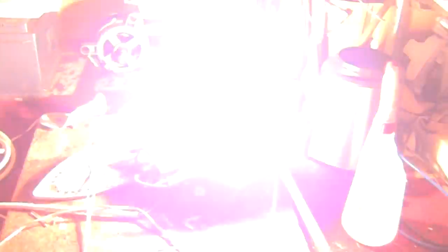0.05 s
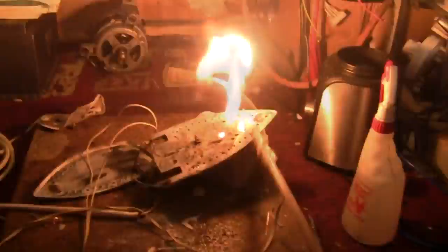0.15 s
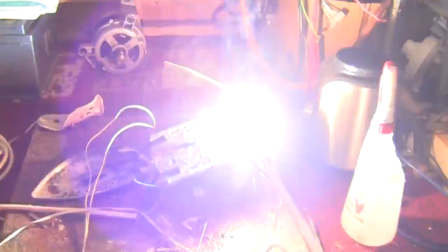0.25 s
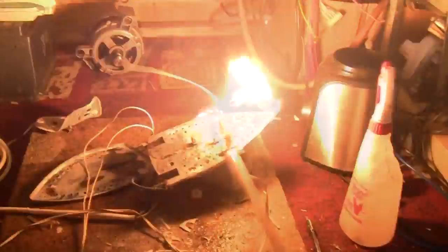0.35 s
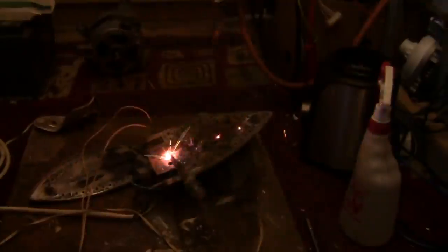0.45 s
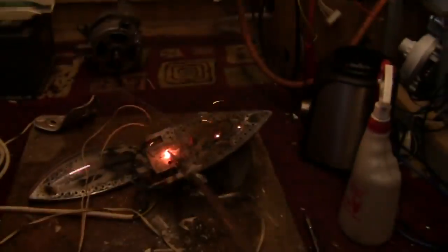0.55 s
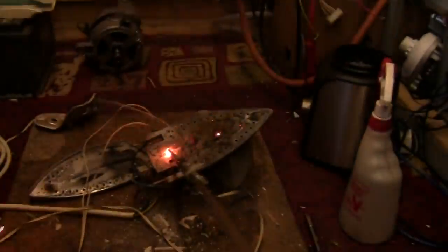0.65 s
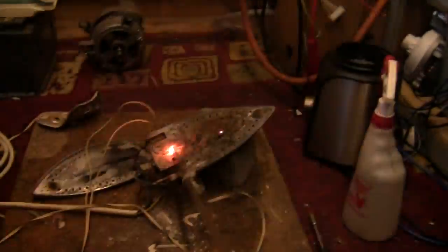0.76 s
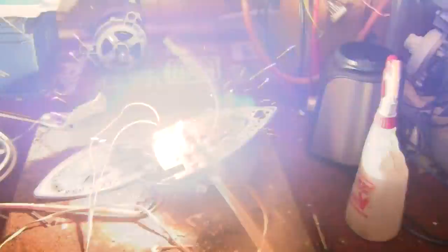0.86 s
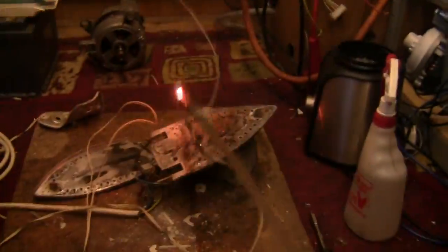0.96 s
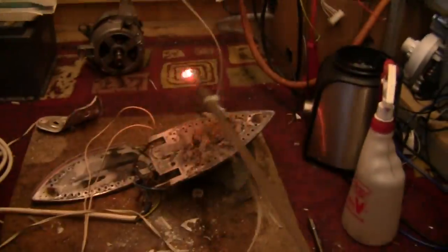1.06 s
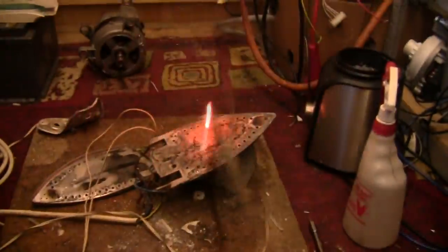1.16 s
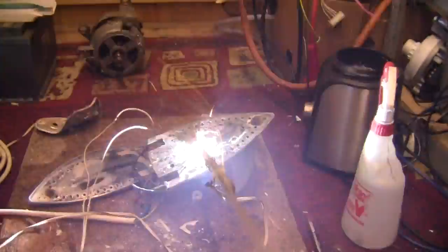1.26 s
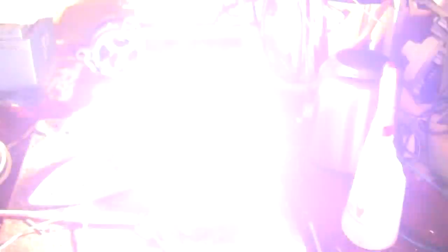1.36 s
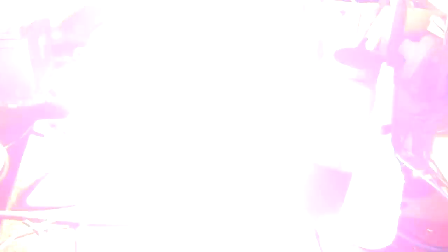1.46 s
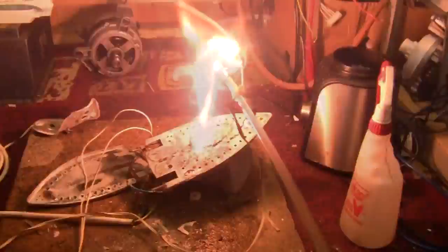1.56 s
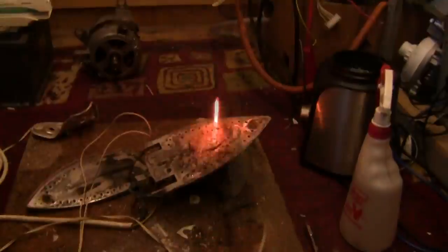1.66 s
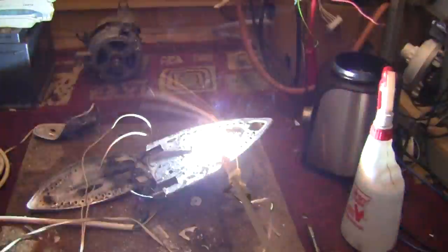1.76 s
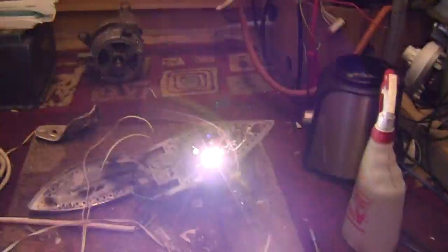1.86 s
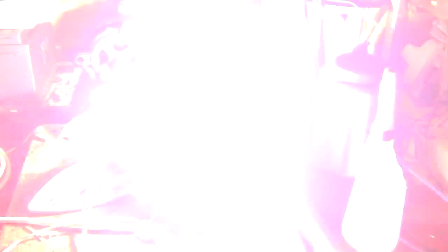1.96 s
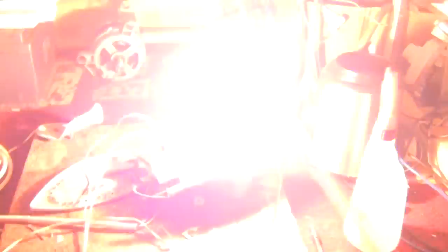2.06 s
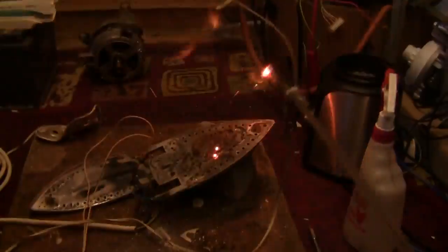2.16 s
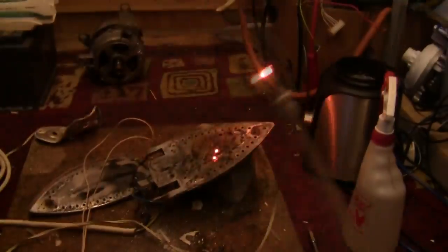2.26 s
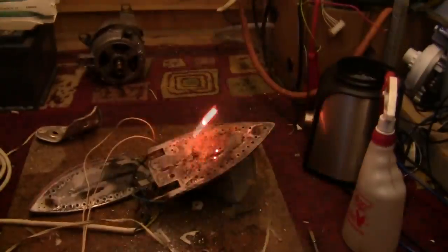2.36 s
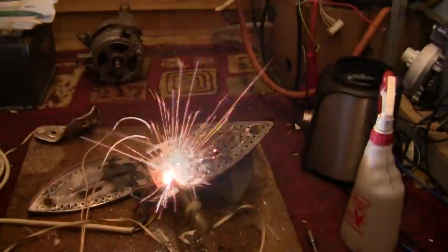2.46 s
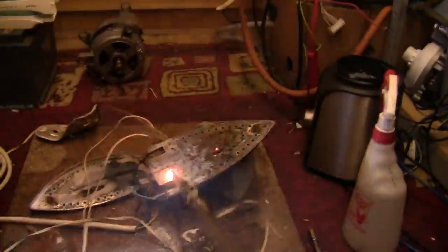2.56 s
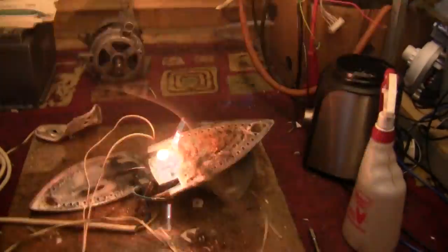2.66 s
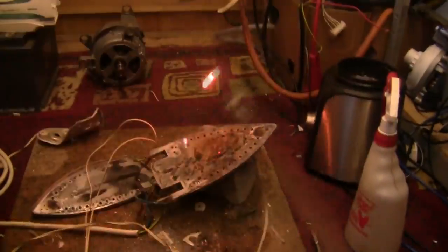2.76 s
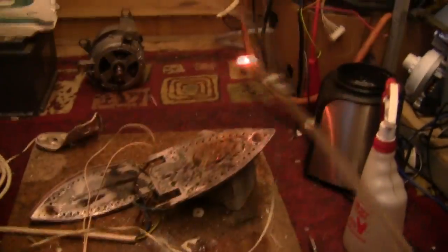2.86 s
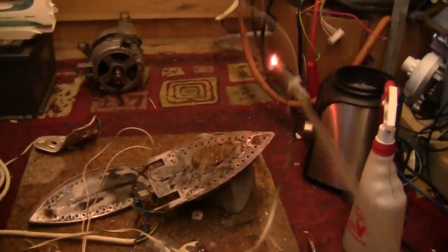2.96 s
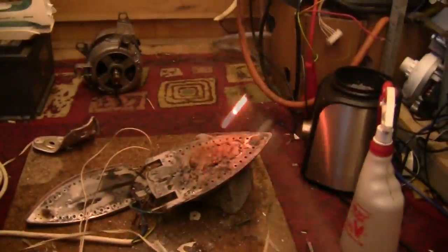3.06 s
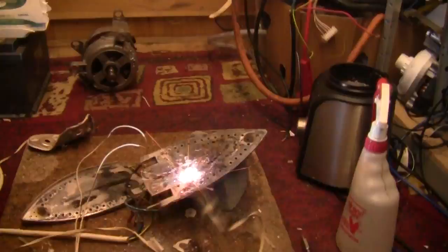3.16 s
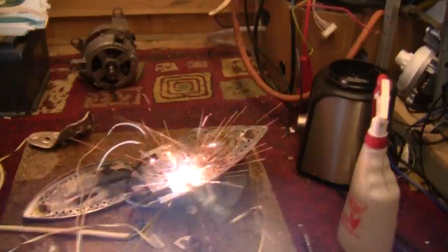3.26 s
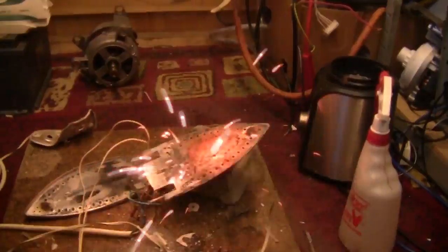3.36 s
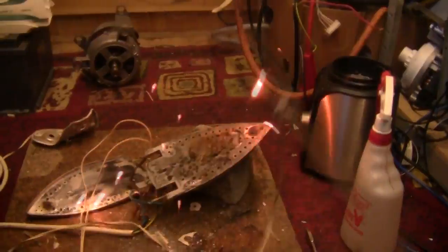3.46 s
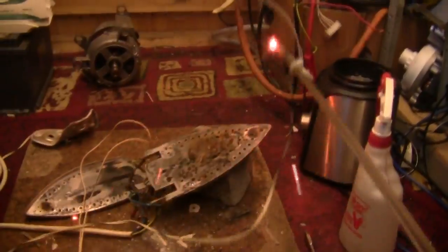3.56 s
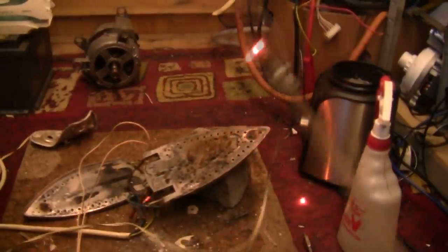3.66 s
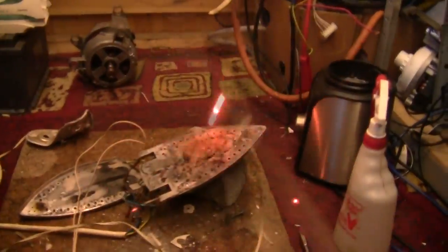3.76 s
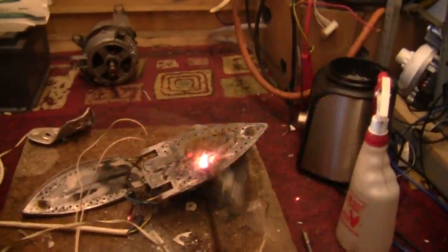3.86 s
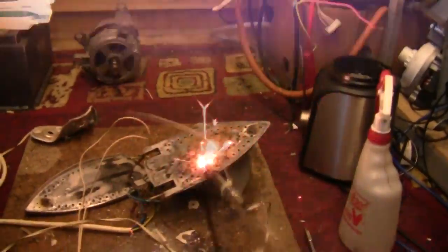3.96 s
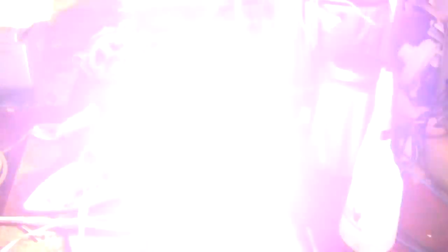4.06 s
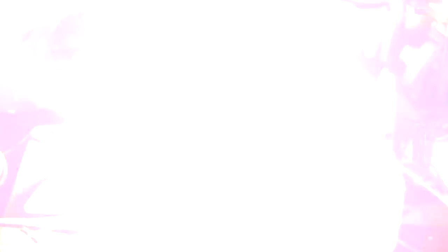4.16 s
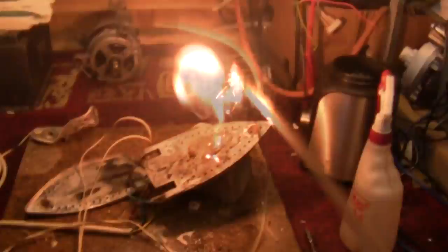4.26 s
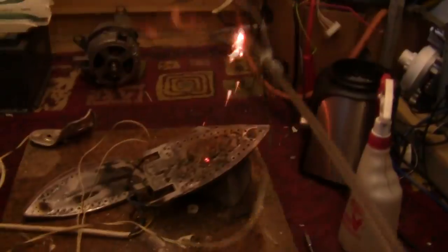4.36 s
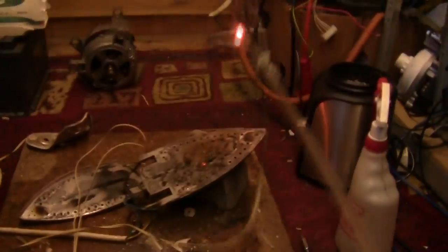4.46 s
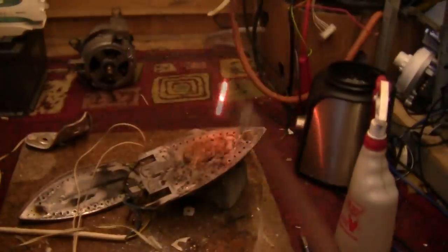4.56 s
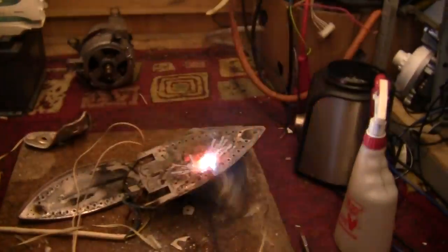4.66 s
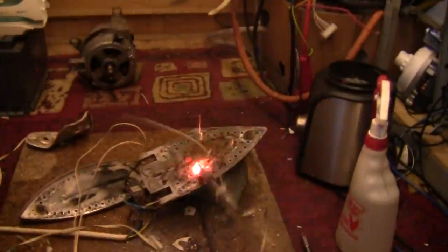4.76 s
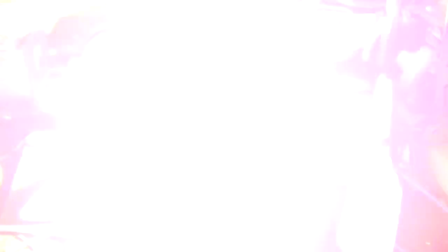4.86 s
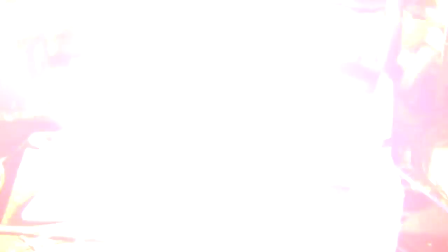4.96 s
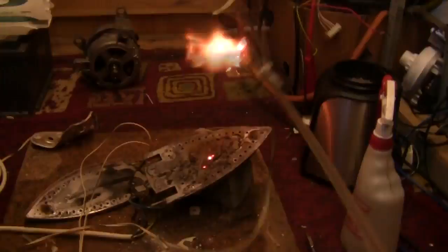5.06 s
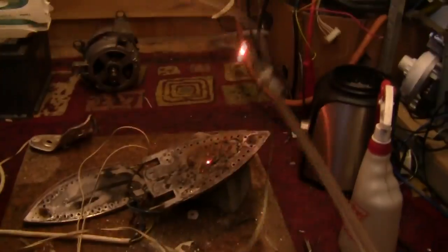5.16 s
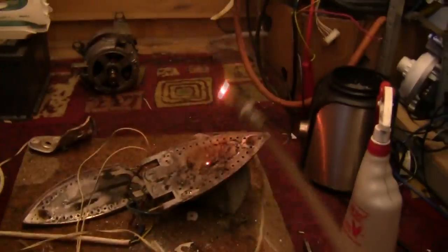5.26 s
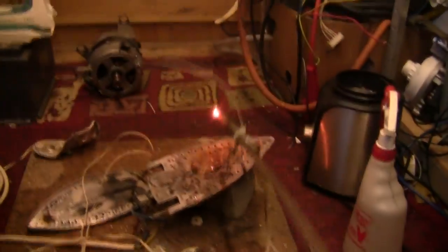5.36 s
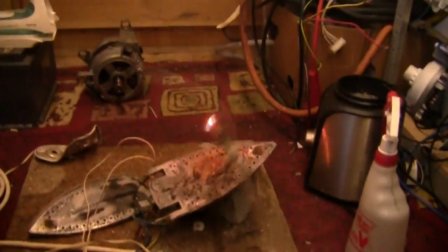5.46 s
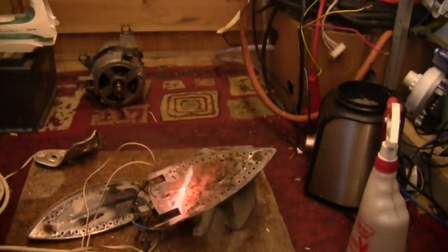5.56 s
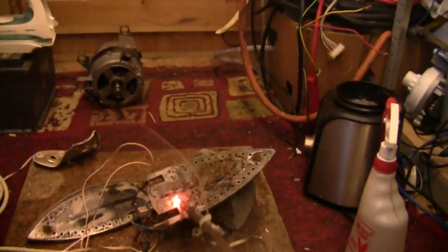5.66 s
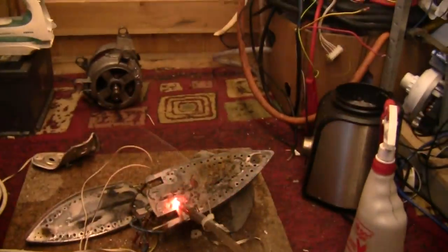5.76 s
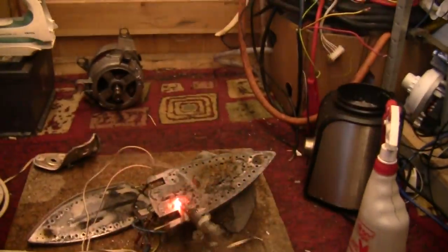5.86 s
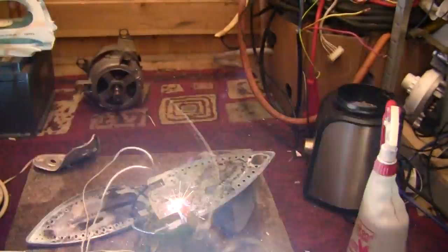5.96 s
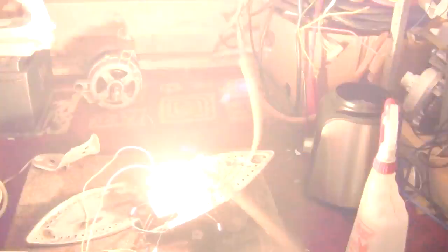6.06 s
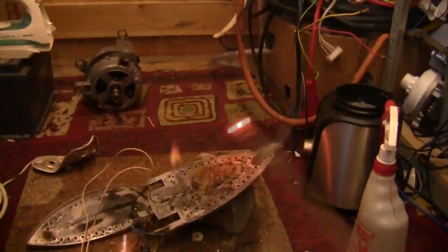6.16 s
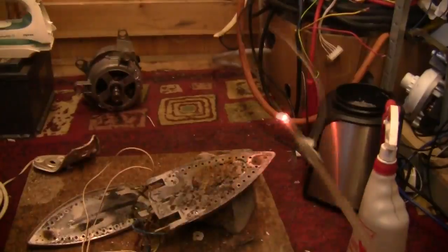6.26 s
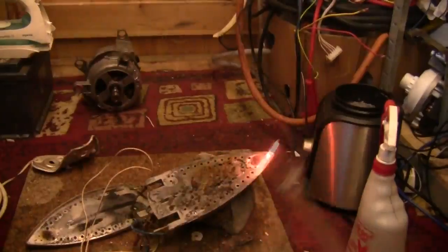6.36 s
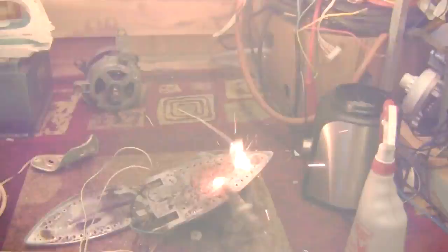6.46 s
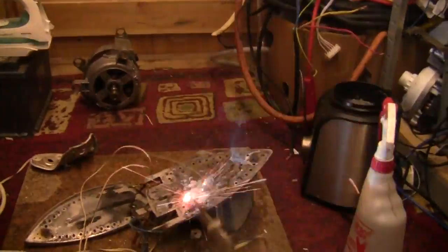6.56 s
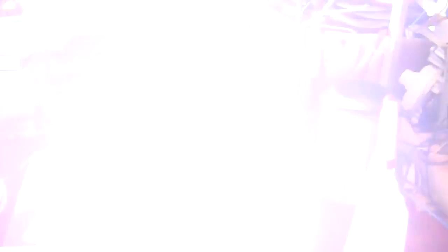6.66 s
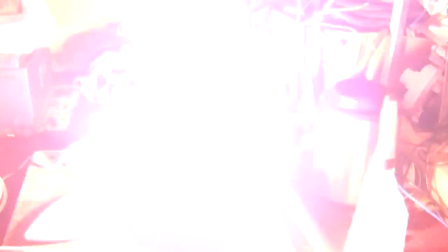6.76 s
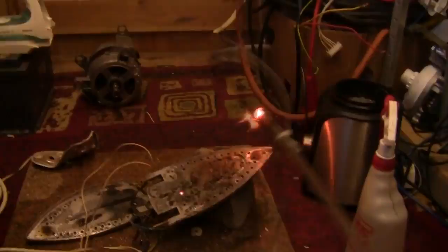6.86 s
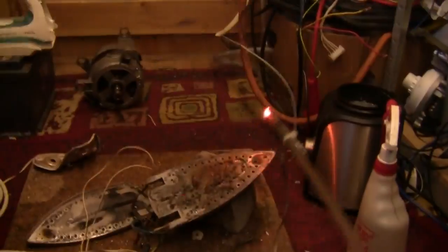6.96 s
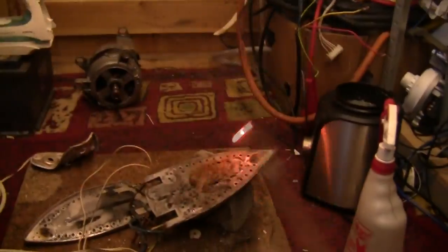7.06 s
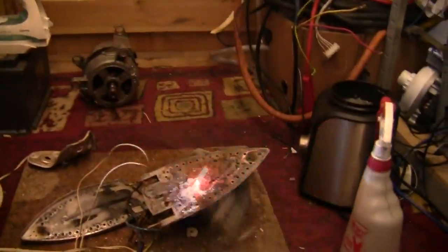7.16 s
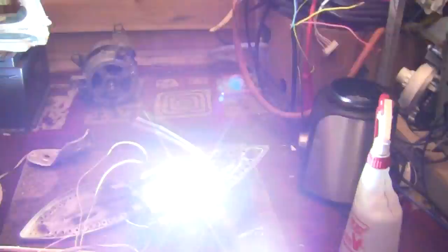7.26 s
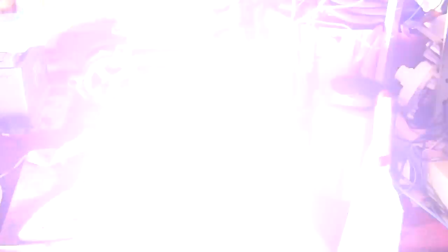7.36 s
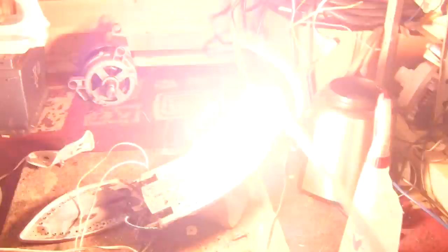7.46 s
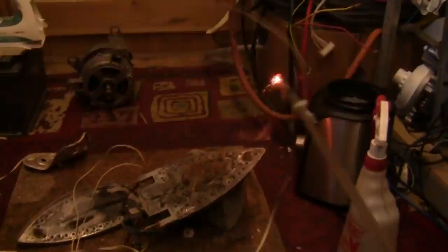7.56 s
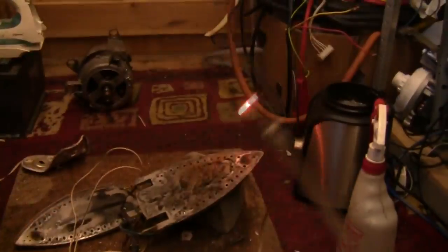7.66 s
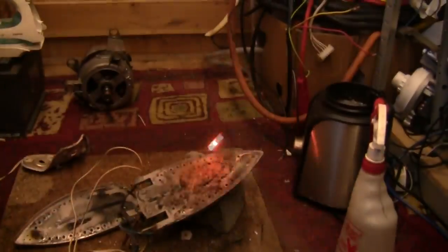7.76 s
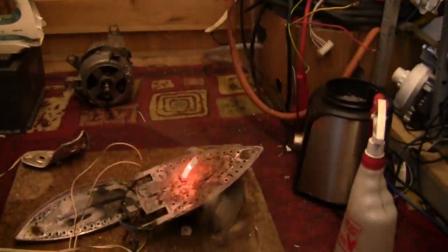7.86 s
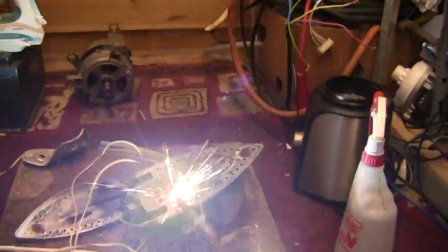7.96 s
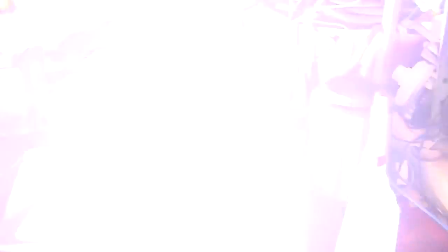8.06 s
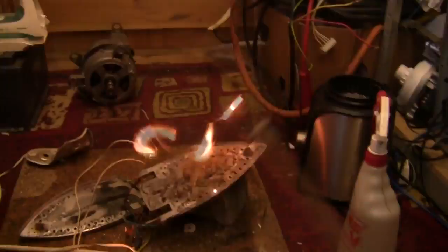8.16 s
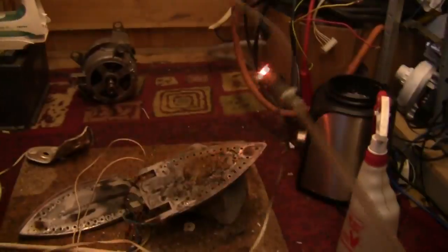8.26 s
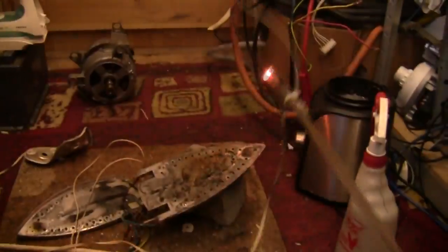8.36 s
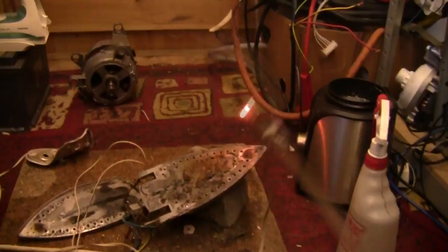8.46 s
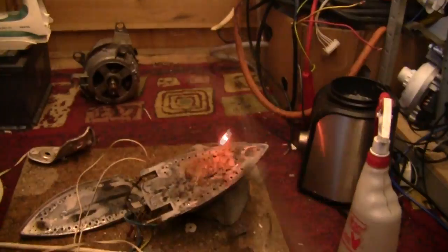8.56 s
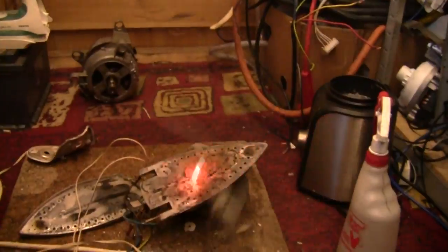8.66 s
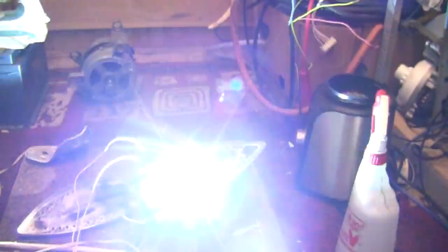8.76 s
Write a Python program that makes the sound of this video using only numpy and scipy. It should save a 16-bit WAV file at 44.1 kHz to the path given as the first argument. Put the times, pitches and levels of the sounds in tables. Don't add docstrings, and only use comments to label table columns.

```python
import sys
import numpy as np
from scipy import signal
from scipy.fft import rfft, irfft, next_fast_len
from scipy.io import wavfile
from scipy.ndimage import uniform_filter1d

SR = 44100
rng = np.random.default_rng(int(sys.argv[2]) if len(sys.argv) > 2 else 0)


def materialize(psi):
    bounded = np.clip(np.atleast_2d(psi).T, -1, 1)
    quanta = np.round(bounded * 32767).astype(np.int16)
    wavfile.write(sys.argv[1], SR, quanta)


def field_ratio(decibels):
    return 10 ** (np.asarray(decibels, dtype=float) / 20)


N = 388521


def curve(rows):
    s, *columns = np.transpose(rows)
    return [np.interp(np.arange(N) / SR, s, column) for column in columns]


def on_log_hz(points, size):
    hz, value = np.transpose(points)
    bins_hz = np.fft.rfftfreq(size, 1 / SR)
    return np.interp(np.log(bins_hz + 1), np.log(hz + 1), value)


def noise(points):
    x = irfft(rfft(rng.standard_normal(N)) * field_ratio(on_log_hz(points, N)), N)
    return x / x.std()


def walk(rate):
    hold = int(SR / rate)
    levels = np.repeat(rng.standard_normal(N // hold + 1), hold)
    return uniform_filter1d(levels, hold)[:N]


def add(track, s, x):
    i = max(int(s * SR), 0)
    track[i:i + len(x)] += x[:N - i]


# start in seconds, peak in dB, low, middle and upper modes in dB.
TAPS = [(0.0, -6, -13.5, -10.5, -3), (0.2693, -10.5, -13, -5, -0.5), (0.5561, -7.5, -17, -8, -12),
        (1.2886, -4.5, -27, -16, -8), (1.798, -10, -6, -3, -26), (1.9124, -20, -2.5, -13.5, -6),
        (2.5467, -28, -1, 2, 2.5), (3.254, -14, -8, -14.5, -8.5), (3.967, -24, -5, -4.5, -1.5),
        (4.7646, -23.5, 1, -6, 1.5), (5.6871, -10.5, 0.5, -5, -9.5), (6.507, -19.5, -10.5, -11, -0.5),
        (6.653, -26, -29, -6.5, -4.5), (7.2882, -16, -14, -10, -11), (8.031, -18.5, -8, -7.5, -12),
        (8.8056, -41, 24, 0.5, -16)]
MODES_HZ = [505, 548, 877, 1050, 1290, 1518, 1652, 1761, 1889, 2293, 2530, 2585, 2855, 3165, 3240, 3450,
            3550, 3720, 3890, 4300, 4765]
# level in dB, t60 in seconds.
MODES = [(-4.5, 0.5), (0, 0.12), (-10, 0.12), (-11, 0.061), (-3, 0.2), (-10.5, 0.13), (0, 0.1), (2, 0.12),
         (5.5, 0.145), (-4.5, 0.08), (-7, 0.09), (-5, 0.16), (-6, 0.05), (-14.5, 0.11), (3, 0.05),
         (3.5, 0.04), (-10.5, 0.081), (-16, 0.062), (-3, 0.045), (-13.5, 0.06), (-7, .09)]
# tap number, mode in Hz, gain in dB.
FAVOURS = [(0, 1761, -10), (0, 1889, -7), (0, 2585, -7), (0, 3240, -6), (0, 4765, -11), (1, 505, 11),
           (1, 548, 12), (1, 1652, -8), (1, 1889, -3), (1, 2585, -11), (1, 2855, 7), (1, 3240, -9),
           (2, 1290, 7), (2, 1761, -11), (2, 1889, -8), (2, 2585, -7), (3, 2585, -10), (3, 3165, 9),
           (3, 3240, 4), (3, 3450, 7), (3, 4300, -8), (4, 1652, -8), (4, 1761, -6), (4, 1889, -4),
           (4, 2585, -5), (5, 2585, -11), (6, 505, 12), (6, 1518, -10), (6, 1761, 8), (6, 1889, -7),
           (6, 2293, 12), (6, 2855, -10), (6, 3450, 9), (6, 3890, 12), (7, 548, 9), (7, 1290, -10),
           (7, 2585, 4), (7, 3240, 9), (7, 3450, 12), (8, 1652, 11), (8, 1889, -13), (8, 3450, 12),
           (9, 1889, -14), (10, 1290, -8), (10, 1761, -6), (10, 1889, -6), (10, 2585, -7), (10, 3240, 7),
           (10, 3450, 8), (10, 3890, 12), (11, 1761, 11), (11, 3450, 10), (13, 1889, -10), (13, 2585, -8),
           (13, 3240, 11), (13, 3550, 12), (14, 3240, 12), (14, 3550, 12)]
# frequency in Hz, density in dB per Hz.
TREBLE = [(1500, -0.5), (2300, 2), (3700, 4), (5200, -1.5), (8300, 0.5), (10000, -2), (11500, -12),
          (13500, -15.5), (15000, -23.5), (16500, -54)]
# frequency in Hz, density in dB per Hz.
BODY = [(50, -38), (150, 8.5), (300, 6), (700, 4.5), (1500, -2.5), (2500, -6), (5000, -37.5)]
LOWEST_DB = -24
DAMP_PER_DB = 0.018
THUD_DB, THUD_SHARE = -28.5, 0.27


def plate():
    scatter_db, push_s, thud_hz = 1.5, 0.0011, 185
    out, t = np.zeros(N), np.arange(SR // 2) / SR
    hz = np.array(MODES_HZ)[:, None]
    db, t60 = np.transpose(MODES)[:, :, None]
    chance = rng.standard_normal((len(TAPS), 3, len(MODES), 1))
    crack = noise(BODY) + 0.84 * noise(TREBLE)
    push = 1 - np.exp(-t / push_s)
    thud_tone = np.sin(2 * np.pi * thud_hz * t) + 0.7 * np.sin(2 * np.pi * 1.33 * thud_hz * t)
    thud_shape = 1000 ** (-t / 0.37) * (1 - np.exp(-t / 0.00066))
    for tap, (s, peak_db, low_db, middle_db, upper_db) in enumerate(TAPS):
        size, detune, turn = chance[tap]
        regions = [hz < 700, hz < 1450, hz < 2100, hz < 3000]
        colour_db = np.select(regions, [LOWEST_DB - peak_db, low_db, middle_db, 0], upper_db)
        for number, mode, gain_db in FAVOURS:
            if number == tap:
                colour_db = colour_db + gain_db * (abs(hz / mode - 1) < 0.022)
        tones = np.sin(2 * np.pi * hz * (1 + 0.0015 * detune) * t + 3 * turn)
        damping = 1 - DAMP_PER_DB * (peak_db + 19)
        modes = field_ratio(db + colour_db + scatter_db * size) * tones * 1000 ** (-t / t60 * damping)
        ring = modes.sum(axis=0) * push
        snap = field_ratio(-3) * crack[int(s * SR / 2):][:len(t)] * np.exp(-t / 0.0058) * push
        thud = field_ratio(THUD_DB - (1 - THUD_SHARE) * peak_db + 4) * thud_tone * thud_shape
        add(out, s, field_ratio(peak_db - 3.5) * (ring + snap + thud))
    return out


# start in seconds, treble in dB, cooling in dB per second
# (negative swells), low part in dB relative to the treble.
SIZZLE = [(0.0, -58.5, -7, 4.5), (.6, -55, 6, 10.5), (1.0, -58.5, 10, 5), (1.7, -61, 2.5, 9),
          (2.2, -66, -5.5, 2), (2.356, -50.5, 3, -3.5), (2.6, -48.5, 21, 3.5), (2.8, -50, 36.5, -0.5),
          (3.5, -67.5, 13, 10.5), (4.4, -67, 0.5, 14.5), (5.15, -67, 3, 16), (5.8, -63, -7, 16),
          (6.25, -72.5, -16, 20.5), (6.57, -62, 7.5, 17.5), (6.95, -67, 10, 11.5), (7.65, -70.5, -1, 4.5),
          (8.3, -69.5, 8, 2)]
GLOW_DB, GLOW_LOW_DB, GLOW_T60_S = -39, 10.5, 0.45
LOW_COOLING = 0.75


def heat():
    t = np.arange(N) / SR
    starts = np.transpose(SIZZLE)[0]
    current = np.searchsorted(starts, t, "right").clip(1) - 1
    start, db, cooling, low_db = np.array(SIZZLE)[current].T
    fall_db = cooling * (t - start)
    high = field_ratio(uniform_filter1d(db - fall_db, SR // 40))
    low = field_ratio(uniform_filter1d(db + low_db - LOW_COOLING * fall_db, SR // 40))
    glow = np.zeros(N)
    for s, peak_db, *_ in TAPS:
        add(glow, s, field_ratio(peak_db + GLOW_DB) * 1000 ** (-t[:SR // 2] / GLOW_T60_S))
    return high + glow, low + field_ratio(GLOW_LOW_DB) * glow


# centre in Hz, width in Hz, gain in dB.
PITS = [(3900, 250, 0), (6000, 200, 4), (7200, 200, 1), (8200, 250, 3), (9700, 600, 6), (12100, 200, 6)]
FIZZ_S = (2.3, 3.2)


def sizzle():
    high, low = heat()
    grain = field_ratio(1.5 * walk(180) + 1.5 * walk(30))
    hz, t = np.fft.rfftfreq(N, 1 / SR), np.arange(N) / SR
    bands = 1 + sum(field_ratio(db) / (1 + (2 * (hz - f) / width) ** 2) for f, width, db in PITS)
    pits = irfft(rfft(noise(TREBLE)) * bands, N)
    wet = (t > FIZZ_S[0]) * (t < FIZZ_S[1])
    fizz = np.where(wet, pits / pits.std(), noise(TREBLE))
    return grain * (high * fizz + low * noise(BODY))


# time in seconds, firing rate in Hz, level in dB, load in dB.
VEHICLE = [(0.0, 47.51, -50.5, 10), (1.86, 36.15, -72, -1.5), (2.6, 38.55, -64, -5),
           (3.21, 33.54, -55, -48.5), (4.29, 34.2, -52, -10), (4.42, 37.32, -46.5, -4.5),
           (7.09, 53, -56, 11), (7.56, 49.87, -59, 0), (7.95, 55.86, -71, -0.5), (8.4, 58.15, -65.5, 11),
           (8.81, 57.9, -63.5, 3)]
ORDERS_DB = [8, -0.5, -10.5]


def vehicle():
    hz, db, load_db = curve(VEHICLE)
    phase = 2 * np.pi * np.cumsum(hz * (1 + 0.0074 * walk(8))) / SR
    orders = sum(field_ratio(order_db + 4 * walk(7)) * np.sin((k + 2) * phase)
                 for k, order_db in enumerate(ORDERS_DB))
    return np.sqrt(2) * field_ratio(db) * (np.sin(phase) + field_ratio(load_db) * orders)


# frequency in Hz, density in dB per Hz.
TOWN = [(20, -34), (40, -14.5), (62, -29.5), (100, 8), (130, 1), (170, -9.5), (250, -2.5), (400, -14.5),
        (1140, -22), (1810, -24.5), (2640, -35.5), (9860, -54), (15600, -72)]
TOWN_DB = -44.5


def town():
    side = [(hz, db - max(0, 4.3 * np.log2(6000 / hz))) for hz, db in TOWN]
    apart = noise(side) * np.array([[1], [-1]])
    return field_ratio(TOWN_DB + walk(0.94)) * (noise(TOWN) + field_ratio(-10.5) * apart)


SHED_T60_S, SHED_DB = 0.16, -4


def shed():
    t = np.arange(SR // 2) / SR
    mid, side = rng.standard_normal((2, len(t))) * 1000 ** (-t / SHED_T60_S) * (t > 0.003)
    side = field_ratio(1.0) * signal.lfilter(*signal.butter(1, 7000, "high", fs=SR), side)
    return (mid + side * np.array([[1], [-1]])) * field_ratio(SHED_DB) / np.sqrt(np.sum(mid ** 2))


SHORT_DB, SAG_DB = -47.5, 28
BRIGHT_AT, BRIGHT_DB = 0.57, -20
DULL_DB, HUSH_DB = 42.5, 17.5
LEAD_S = 0.012


def pull(t, start, full, end, top_db, hiss_db):
    fade_s, fade_db = 0.13, 27
    length = np.clip((np.minimum(t, end) - start) / max(full - start, 0.01), 0, None)
    thump = top_db - np.where(length < 1, top_db - SHORT_DB, SAG_DB) * (1 - length) ** 2
    bright_db = min(BRIGHT_DB, top_db + 7.5)
    rasp = bright_db - (bright_db - SHORT_DB) * np.clip(1 - length / BRIGHT_AT, 0, 1) ** 2
    over = rasp - DULL_DB * np.clip(length - BRIGHT_AT, 0, None) ** 3
    hiss = hiss_db - HUSH_DB * length ** 2
    when = [start - LEAD_S - 0.004, start - LEAD_S, end, end + 0.023, end + fade_s, end + 2 * fade_s]
    thump_gone = np.interp(t, when, [-60, 0, 0, -0.36 * fade_db, -fade_db, -65])
    tone_gone = np.interp(t, when, [-60.5, -1.5, -0.5, -13.0, -36.5, -66.0])
    hiss_gone = np.interp(t, when, [-59.5, 2.5, 5.0, -15.0, -34.5, -58.5])
    return thump + thump_gone, over + tone_gone, rasp + tone_gone, hiss + hiss_gone


# pull start, fullest arc and break in seconds, fullest thump in dB, hiss in dB.
ARCS = [(.02, .195, .235, -14.5, -44), (.33, .44, .455, -17.5, -47), (.905, .955, .975, -36, -50),
        (1.34, 1.605, 1.655, -14.5, -47), (1.97, 2.155, 2.197, -15.5, -45), (2.69, 2.735, 2.755, -31, -45),
        (3.385, 3.415, 3.43, -32, -55), (4.07, 4.305, 4.335, -16, -42), (4.905, 5.055, 5.108, -15.5, -47),
        (6.09, 6.155, 6.172, -21.5, -47), (6.69, 6.85, 6.895, -15, -44), (7.34, 7.535, 7.58, -15, -44),
        (8.06, 8.205, 8.228, -16.5, -56)]
THUMP_HZ, CYCLE_START_S = 99.89, 0.004
RASP_DB, RASP_SLOPE_DB, ROAR_DB = -12.5, -2.1, -21
ODD_DB = -9
SLIP, WANDER = 1.7, 0.08


def arc():
    lag, spread = 0.2, 1.1
    coarse = np.arange(0, N / SR, 0.001)
    levels = np.max([pull(coarse, *row) for row in ARCS], axis=0)
    thump_db, over_db, rasp_db, hiss_db = curve(np.vstack([coarse, levels]).T)
    phase = 2 * np.pi * THUMP_HZ * (np.arange(N) / SR + CYCLE_START_S) + 0.03 * walk(40)
    long = np.clip((thump_db + 19) / 4.5, 0, 1) ** 2

    def tone(k, db):
        w = walk(25)
        slip = lag + spread * (k > 2) + SLIP * long * (k - 2.6) + WANDER * (k - 2) * w[::-1]
        level_db = db + 0.4 * k ** 0.8 * w + ODD_DB * (k > 6) * (k % 2)
        return field_ratio(level_db) * np.sin(k * phase - slip)

    over = field_ratio(over_db) * (tone(2, 0) + tone(3, -7))
    rasp = sum(tone(k + 4, rasp_db + RASP_DB + RASP_SLOPE_DB * k) for k in range(14))
    thump = np.sqrt(2) * (field_ratio(thump_db) * np.sin(phase) + field_ratio(-3.5) * (over + rasp))
    low_roar = (field_ratio(hiss_db + 0.5) + field_ratio(rasp_db + ROAR_DB)) * noise(BODY)
    roar = field_ratio(hiss_db) * noise(TREBLE) + low_roar
    grain = field_ratio(2.5 * walk(180) + 1.5 * walk(30)) * (1 + 0.2 * np.cos(phase))
    return thump, roar * grain, phase


SPARK_BANDS_HZ = [3000, 5000, 7500, 11000]


def colours():
    hz, whole = np.fft.rfftfreq(N, 1 / SR), rfft(noise(TREBLE))
    shares = np.eye(len(SPARK_BANDS_HZ))
    return np.array([irfft(whole * np.interp(hz, SPARK_BANDS_HZ, share), N) for share in shares])


# start in seconds, peak in dB, low part in dB, t60 in seconds.
FLASHES = [(0.0478, -1.5, -20.5, 0.016), (0.2697, -13, 11, 0.02), (0.3366, -15.5, -14.5, 0.097),
           (0.5565, -15.5, -9.5, 0.093), (0.911, -1.5, -3, 0.018), (1.287, -0.5, -19.5, 0.083),
           (1.7948, -22, 13, 0.077), (1.9591, -6, -39.5, 0.0098), (2.554, -11, -7, 0.079),
           (2.6756, -5.5, -22, 0.15), (3.2519, -5.5, -19.5, 0.12), (3.294, -18, -12, 0.051),
           (3.309, -8, -18.5, 0.15), (3.4005, -5, -6, 0.084), (3.966, -14, -6, 0.27),
           (4.0485, -11, -13.5, 0.037), (4.1035, -10, -6.5, 0.16), (4.772, -6, -6.5, 0.058),
           (4.812, -16.5, -35, 0.09), (4.8921, -12, -3.5, 0.14), (5.687, -0.5, -18, 0.041),
           (6.0667, -4, -7.5, 0.19), (6.5147, -4, -22, 0.09), (6.6527, -8, -10, 0.044),
           (6.699, -5.5, -44, 0.19), (6.7359, -4, -33, 0.031), (7.2847, -8, -1.5, 0.088),
           (7.3801, -19.5, -20, 0.047), (8.0289, -9.5, -6, 0.23), (8.081, -14, -27, 0.1)]
# start in seconds, peak in dB, t60 in seconds.
SPATTER = [(0.0857, -26.5, 0.062), (0.195, -16, 0.053), (0.2357, -22.5, 0.027), (0.8976, -17, 0.26),
           (1.4069, -17, 0.043), (1.4518, -20.5, 0.053), (1.4903, -32, 0.071), (1.509, -17.5, 0.091),
           (1.551, -21, 0.065), (1.6085, -24, 0.087), (1.8433, -21.5, 0.69), (1.909, -22.5, 0.046),
           (2, -25, 0.052), (2.0888, -31.5, 0.125), (2.129, -22, 0.17), (2.7331, -17.5, 0.016),
           (4.172, -19.5, 0.035), (4.2163, -22, 0.11), (4.2388, -27, 0.072), (4.2555, -35, 0.048),
           (4.2725, -25, 0.1), (4.846, -11, 0.023), (6.8052, -20.5, 0.2), (6.8756, -19, 0.041),
           (7.399, -16, 0.062), (7.437, -24.5, 0.038), (7.458, -16, 0.02), (7.4796, -19, 0.14),
           (8.167, -20, 0.2), (8.2141, -26, 0.0097)]
# start in seconds, peak in
# dB.
BEADS = [(0.2112, -31.5), (0.4438, -31), (0.9099, 4.5), (2.06, -27), (2.148, -26.5), (2.5473, -3),
         (2.565, -3.5), (3.322, -2), (3.3346, -8), (3.372, -16.5), (3.3913, -6.5), (3.412, -5.5),
         (4.1358, -15.5), (4.319, -24), (4.9731, -29), (4.995, -24.5), (5.032, -19), (5.0717, -22.5),
         (5.0906, -26), (6.0867, -20), (6.132, -14), (6.1574, -16), (6.511, -8.5), (6.515, -5.5),
         (6.547, -8), (6.706, -12), (7.498, -39), (7.538, -20.5), (7.577, -35), (8.8045, -16),
         (0.5963, -17.5), (3.018, -27), (3.155, -31), (3.617, -35), (3.6374, -48.5), (3.6822, -41),
         (3.7743, -37), (3.8457, -36.5), (4.661, -33.5), (4.7125, -35), (6.437, -28.5), (8.375, -50),
         (8.43, -33), (8.499, -45.5), (8.5923, -43)]
FLASH_CLICK_DB, SPATTER_CLICK_DB, SPATTER_LOW_DB = -3.5, 1.5, -7.5
BEAD_CLICK_DB, BEAD_LOW_DB, BEAD_T60_S = -6.5, -4.5, 0.024
BREAK_DB, BREAK_LOW_DB, BREAK_T60_S = -20, 20, 0.031
SPARK_COLOUR_DB, SPARK_LATE_S = 4, 0.0012


def sparks(phase):
    shock_hz, rise_s, knee, spit_db, grain_db = 6000, 0.00096, 1.41, -3, 5.0
    high, low, clicks = np.zeros((len(SPARK_BANDS_HZ), N)), np.zeros(N), np.zeros(N)
    t = np.arange(SR // 4) / SR
    shock = np.sin(2 * np.pi * shock_hz * t[:40]) * np.exp(-t[:40] / 0.000073)
    window = np.hanning(len(shock))
    shock = shock - shock.sum() * window / window.sum()
    events = [(*row, FLASH_CLICK_DB) for row in FLASHES]
    events += [(s, db, SPATTER_LOW_DB, t60, SPATTER_CLICK_DB) for s, db, t60 in SPATTER]
    events += [(s, db, BEAD_LOW_DB, BEAD_T60_S, BEAD_CLICK_DB) for s, db in BEADS]
    events += [(end - 0.01, db + BREAK_DB, BREAK_LOW_DB, BREAK_T60_S, BEAD_CLICK_DB)
               for *_, end, db, _ in ARCS]
    tints = field_ratio(SPARK_COLOUR_DB * rng.standard_normal((len(events), len(high))))
    for (s, peak_db, low_db, t60, click_db), tint in zip(events, tints):
        s = s + SPARK_LATE_S
        hold = 1000 ** -(t / max(t60, 0.01)) ** knee
        spit = field_ratio(spit_db) * np.exp(-t / 0.0034)
        puff = field_ratio(peak_db - 17.5) * (hold + spit) * (1 - np.exp(-t / rise_s))
        for band, gain in zip(high, tint / np.sqrt(np.mean(tint ** 2))):
            add(band, s, gain * puff)
        add(low, s, field_ratio(low_db) * puff)
        add(clicks, s + 0.00092, field_ratio(peak_db + 2 * click_db) * shock)
    ragged = field_ratio(grain_db * walk(350)) * (1 + 0.15 * np.cos(phase))
    return ragged * ((high * colours()).sum(axis=0) + low * noise(BODY)) + clicks


# peak time in seconds, level in dB, low part in dB.
SNAPS = [(0.049, -15, -14), (0.0888, -31, -14), (0.1974, -25, -13), (0.2073, -33.5, -0.5),
         (0.2363, -32.5, -4.5), (0.2687, -12.5, 2), (0.3378, -21, -16), (0.5585, -17.5, 0),
         (0.9149, -12, -16), (1.4528, -37.5, -6), (1.4922, -29.5, -10), (1.5137, -36.5, -9),
         (1.5546, -25, -8.5), (1.7982, -24, -5), (1.8432, -30, 0.5), (1.9137, -26, -7), (1.9633, -19, -20),
         (2.0057, -27, -9), (2.09, -30, -9.5), (2.1075, -31, -3), (2.1303, -37, -12), (2.1496, -35, -5.5),
         (2.5546, -10, -9), (2.5639, -13, -2.5), (2.6746, -14, -19), (2.6854, -35, -11.5), (2.7356, -19, 0),
         (3.2968, -17.5, -19), (3.315, -23.5, -18), (3.3756, -30, -18.5), (3.4037, -11.5, -27),
         (3.4177, -24.5, -8.5), (4.048, -14, -7), (4.1068, -15.5, -8), (4.1742, -31.5, 2),
         (4.2197, -31, -11), (4.2378, -28, -16), (4.2595, -28.5, -11), (4.2764, -24, -6.5),
         (4.321, -36.5, -11), (4.8169, -17, -18.5), (4.8468, -36, -18), (4.8932, -23.5, -17),
         (4.997, -33.5, -1), (5.0135, -34, -3), (5.6883, -21.5, -4), (6.0679, -23.5, -17.5),
         (6.517, -9.5, -14), (6.6577, -21.5, -23), (6.742, -22.5, -18), (6.8064, -24, -9),
         (6.881, -36.5, -3.5), (7.381, -19.5, -24), (7.4004, -24.5, -14), (7.4386, -24.5, -11.5),
         (7.4585, -19.5, -10.5), (7.4808, -24, -12), (7.4993, -33.5, -20), (8.2197, -26, -11),
         (8.808, -24, -2.5)]
SNAP_RISE_S, SNAP_FALL_S = 0.0004, 0.0012


def snaps():
    high, low = np.zeros((len(SPARK_BANDS_HZ), N)), np.zeros(N)
    t = np.arange(SR // 40) / SR
    shape = 2.34 * (1 - np.exp(-t / SNAP_RISE_S)) * np.exp(-t / SNAP_FALL_S)
    tints = field_ratio(4.8 * rng.standard_normal((len(SNAPS), len(high))))
    for (s, db, low_db), tint in zip(SNAPS, tints):
        start = s - 2 * SNAP_RISE_S
        for band, gain in zip(high, tint / np.sqrt(np.mean(tint ** 2))):
            add(band, start, gain * field_ratio(db) * shape)
        add(low, start, field_ratio(db + low_db) * shape)
    return (high * colours()).sum(axis=0) + low * noise(BODY)


# start in seconds, level in dB, centre in Hz, t60 in seconds.
SQUEALS = [
    (.196, -24, 4950, 0.026),
    (.598, -42, 8260, 0.18),
    (1.962, -19, 9000, 0.024),
    (8.215, -26, 5370, 0.039),
    (8.428, -57, 4300, 0.1),
]


def squeals():
    width = 0.09
    out, t = np.zeros(N), np.arange(SR // 4) / SR
    for s, db, hz, t60 in SQUEALS:
        edges = [hz * (1 - width), hz * (1 + width)]
        sos = signal.butter(2, edges, "band", fs=SR, output="sos")
        band = signal.sosfilt(sos, rng.standard_normal(len(t)))
        add(out, s, field_ratio(db) * band / band.std() * 1000 ** (-t / t60))
    return out


# start in seconds, end in seconds, pitch in Hz, level in dB.
WHISTLES = [
    (5.76, 6.06, 2300, -45),
    (.62, .86, 2590, -55),
    (3.52, 3.62, 2080, -65),
]


def whistles():
    t, out = np.arange(N) / SR, np.zeros(N)
    for start, end, hz, db in WHISTLES:
        gate = np.interp(t, [start, start + 0.03, end - 0.02, end], [0, 1, 1, 0])
        out += gate * field_ratio(db) * np.sin(2 * np.pi * hz * t + 0.6 * walk(49))
    return out * field_ratio(2.0 * walk(32))


RING_ECHO = 0.4


def scene():
    thump, roar, phase = arc()
    ring = plate()
    bench = sparks(phase) + roar + sizzle() + whistles() + squeals() + snaps()
    echo = signal.fftconvolve((bench + RING_ECHO * ring)[None], shed(), axes=1)[:, :N]
    return ring + bench + echo + thump + vehicle() + town()


def band_limit(x):
    return signal.sosfilt(signal.butter(12, 15740, fs=SR, output="sos"), x)


# frequency in Hz, left minus right in dB.
PORT_DB = [(60, 2), (110, -1), (200, 1), (380, 2.5), (700, 2), (1290, 1.5), (2380, -1.5), (4400, -1.5),
           (8120, -4.5), (15000, -14.5)]


def record(dry):
    size = next_fast_len(N)
    half = field_ratio(on_log_hz(PORT_DB, size) / 2)
    capsule = field_ratio(on_log_hz([(15, -21.5), (33, -0.5), (13000, -0.5), (15500, -9), (17000, -9)], size))
    ports = irfft(rfft(dry, size) * capsule * np.array([half, 1 / half]), size)[:, :N]
    ports = ports + field_ratio(-67.0) * rng.standard_normal(ports.shape)
    mix = np.clip(ports, -1, 1)
    return band_limit(mix)


dry = scene()
out = record(dry)
materialize(out)
```